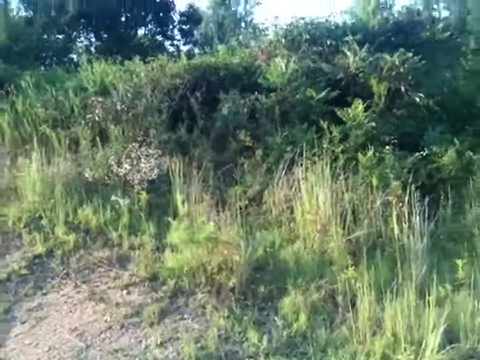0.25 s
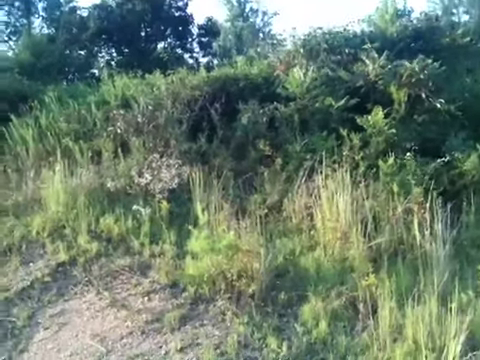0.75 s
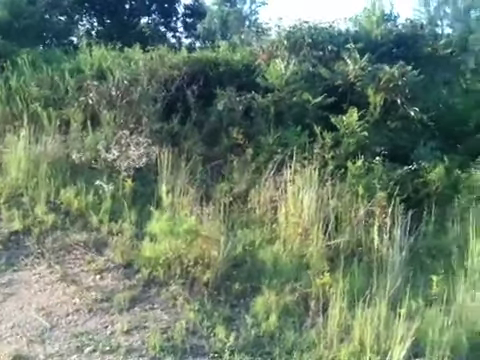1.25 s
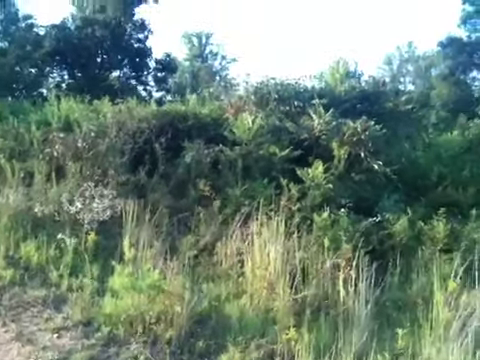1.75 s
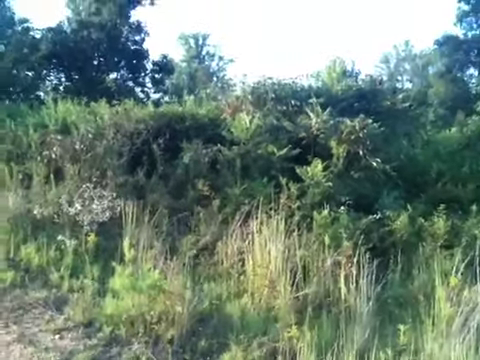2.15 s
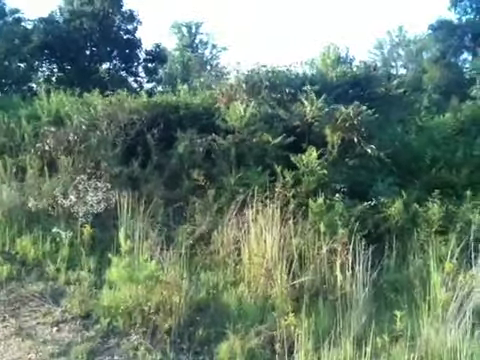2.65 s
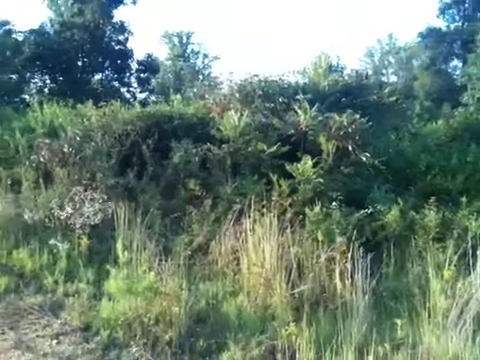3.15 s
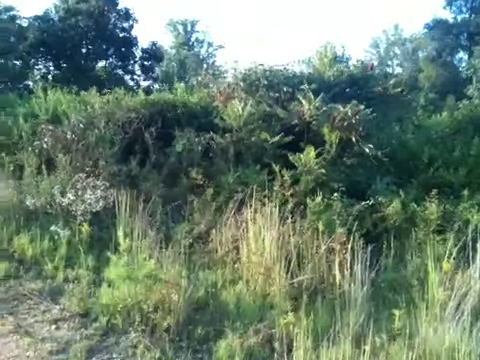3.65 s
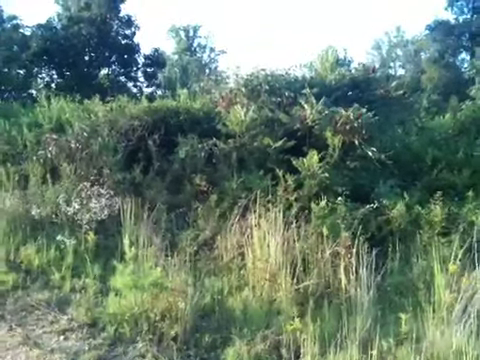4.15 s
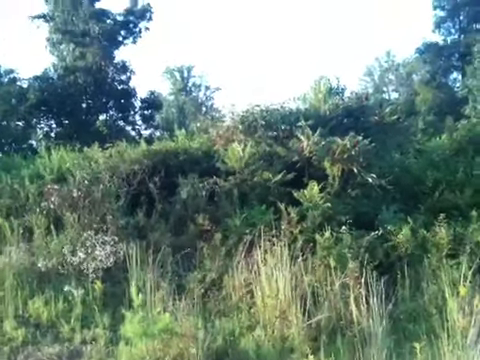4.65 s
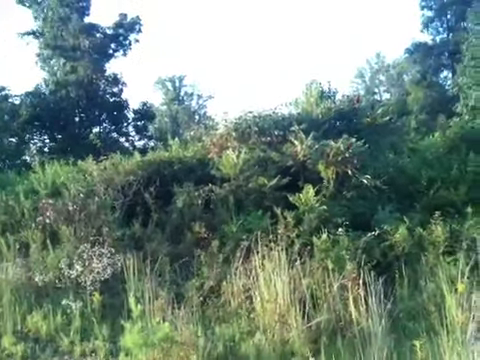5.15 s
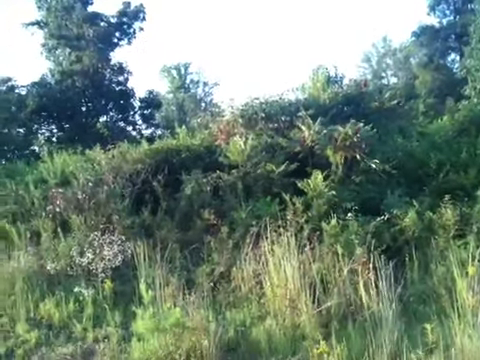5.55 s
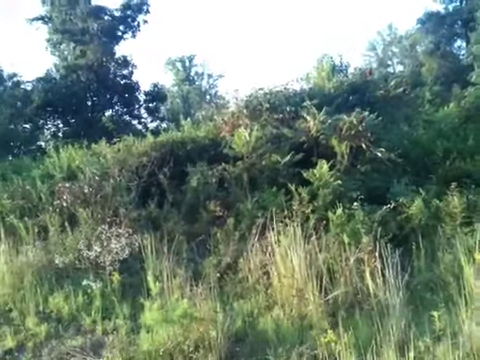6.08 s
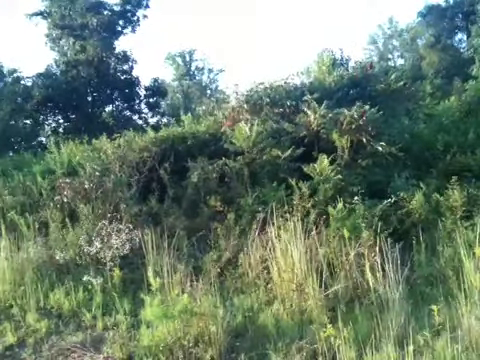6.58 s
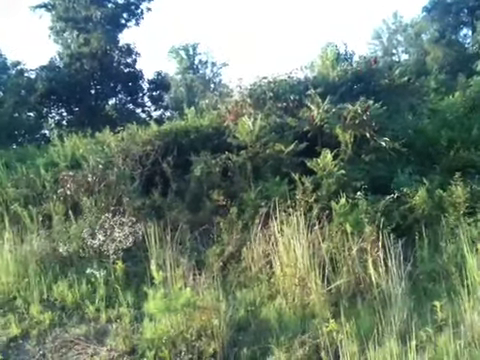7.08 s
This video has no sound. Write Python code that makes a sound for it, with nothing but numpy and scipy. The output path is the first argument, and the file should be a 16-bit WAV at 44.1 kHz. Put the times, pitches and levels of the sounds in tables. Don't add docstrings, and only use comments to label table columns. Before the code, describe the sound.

A small single-cylinder engine mutters, barks in raspy throttle blips, coasts down and pops on the overrun, over faint field insects.

```python
import sys
import numpy as np
from scipy import signal
from scipy.fft import rfft, irfft, next_fast_len
from scipy.io import wavfile
from scipy.ndimage import uniform_filter1d

SR = 44100
rng = np.random.default_rng(int(sys.argv[2]) if len(sys.argv) > 2 else 0)


def attenuation_scalar(level_db):
    decades = np.asarray(level_db, float) / 20
    return 10 ** decades


def master(y):
    cut = np.clip(np.atleast_2d(y).T, -1, 1)
    pcm = np.round(cut * 32767)
    wavfile.write(sys.argv[1], SR, pcm.astype(np.int16))


N = 322812


def rms_one(x):
    return x / np.sqrt(np.mean(x ** 2) + 1e-20)


def in_time(rows):
    s, *columns = np.transpose(rows)
    return [np.interp(np.arange(N) / SR, s, c) for c in columns]


def at_hz(points, hz):
    point_hz, point_db = np.transpose(points)
    return np.interp(np.log(hz), np.log(point_hz), point_db, left=-90, right=-90)


def coloured(spectrum, source=None):
    size = next_fast_len(N)
    hz = np.maximum(np.arange(size // 2 + 1) * SR / size, 1)
    source = rng.standard_normal(size) if source is None else source
    return rms_one(irfft(rfft(source, size) * attenuation_scalar(at_hz(spectrum, hz)), size)[:N])


def drift(rate_hz):
    r = np.exp(-80 * np.pi * rate_hz / SR)
    slow = signal.lfilter([1], [1, -2 * r, r * r], rng.standard_normal(N // 40 + 2002))[2000:]
    return np.interp(np.arange(N) / 40, np.arange(len(slow)), rms_one(slow))


def resonance(x, hz, width_hz):
    r = np.exp(-np.pi * width_hz / SR)
    top = np.array([1, 0, -1]) * (1 - r * r) / 2
    return signal.lfilter(top, [1, -2 * r * np.cos(2 * np.pi * hz / SR), r * r], x + 1e-18)


def passed(x, order, edges_hz, kind):
    return signal.sosfilt(signal.butter(order, edges_hz, kind, fs=SR, output="sos"), x)


# multiple of its pitch, level in dB coasting, at part load, wide open,
# die-away in ms, scatter in dB.
COLUMN = [
    (1.0, 1, -3, -1, 0.78, 0.5),
    (2.03, -30.5, -7.5, -15.5, 1.43, 1),
    (3.0, -10, -27.5, -28.5, 0.27, 5),
    (3.9, -20.5, -32.5, -29, 0.79, 3),
]
# time in s, column pitch in Hz, brightness in dB.
COLOUR = [(0, 575, 14.5), (.5, 546, 7), (.9, 539, 3.5), (1.15, 578, -1.5), (1.6, 569, 5), (2.37, 574, -1.5),
          (3.0, 534, 5.5), (4.6, 536, -4.5), (5.15, 527, -1), (5.6, 460, -15)]
LOAD_DB = [-49, -42, -28]
PORT_OPEN_MS, RISE_MS = 3.05, .7
OVERTONE_BASE_HZ = 563
SECOND_MODE_DB, SECOND_FOLLOWS = -1, 0.49


def pipe(at_s, peak_db, tilt_db, chance):
    ms = np.arange(900) / SR * 1000
    start = np.round(at_s * SR).astype(int)
    pitch_hz, bright_db = (c[start] for c in in_time(COLOUR))
    mode_db = [0, SECOND_MODE_DB + SECOND_FOLLOWS * bright_db, bright_db + tilt_db]
    pitch_hz = pitch_hz * (1 + .008 * chance[:, 0])
    crest = 2 * np.pi * (pitch_hz[:, None] * ms / 1000 - 3 / 4)
    linger = np.interp(peak_db, LOAD_DB, [1.9, 2.1, 1.0])
    rings = 0
    for k, (multiple, *load_db, die_ms, scatter_db) in enumerate(COLUMN):
        level_db = peak_db + np.interp(peak_db, LOAD_DB, load_db) + mode_db[min(k, 2)]
        level_db = level_db + scatter_db * chance[:, k + 1]
        dying = np.exp(-np.maximum(ms - PORT_OPEN_MS, 0) / (die_ms * linger)[:, None])
        stretch = OVERTONE_BASE_HZ / pitch_hz[:, None] if k > 1 else 1
        phase = multiple * stretch * crest - .5 * k + 0.41 * scatter_db * chance[:, [k + 2]]
        rings = rings + attenuation_scalar(level_db)[:, None] * np.cos(phase) * dying
    rings = rings * np.sin(np.pi / 2 * np.minimum(ms / RISE_MS, 1)) ** 2
    out = np.zeros(N + len(ms))
    np.add.at(out, start[:, None] + np.arange(len(ms)), rings)
    return passed(out[:N], 2, 275, "high")


# time in s, peak in dB, crack in dB re peak.
POPS = [(0.305, -54, -18.5), (5.356, -32, -13.5), (5.447, -30.5, -10.5), (5.541, -37, -18),
        (5.694, -29.5, -15), (5.815, -34, -9.5), (5.938, -35, -14.5), (6.066, -48, -12),
        (6.329, -31.5, -20), (6.433, -29.5, -14), (6.648, -31.5, -16)]
# frequency in Hz, level in dB per Hz.
CRACK = [(2200, -43), (2700, 3.5), (3600, 4), (4400, -3.5), (5500, -17.5)]
# frequency in Hz, level in dB per Hz.
CLATTER = [(110, -32), (180, -24.5), (204, -48), (233, -9), (418, 2), (612, 0), (675, 3.5), (843, -8.5),
           (1080, -3.5), (1500, -36.5), (1950, -20.5), (3300, -120)]
# frequency in Hz, level in dB per Hz.
WHINE = [(760, -0.5), (1300, 2), (1370, 1.5), (1750, -1.5), (2060, -5), (2460, -13), (2730, -18.5),
         (3750, -23), (4800, -27), (6240, -60.5), (10600, -120)]
PULSE_LEAD_S = .0027


def firings(turns, height_db):
    at = np.flatnonzero(np.diff(np.floor(turns)))
    peak_db = height_db[at]
    open_wide = np.clip((peak_db + 43.0) / 12, 0, 1)
    chance = rng.standard_normal((400, 7))
    peak_db = peak_db + (1.5 - .6 * open_wide) * chance[:len(at), 6]
    pulses = pipe(at / SR - PULSE_LEAD_S, peak_db, 0, chance[:len(at)])
    pop_s, pop_db, crack_db = np.transpose(POPS)
    pops = pipe(pop_s, pop_db - 8.5, crack_db + 36, chance[-len(POPS):])
    clicks = np.zeros(N)
    clicks[at - round(PULSE_LEAD_S * SR)] = attenuation_scalar(peak_db)
    puffs = uniform_filter1d(clicks, size=25)
    tail = signal.lfilter([1], [1, -attenuation_scalar(-60 / (0.058 * SR))], puffs)
    hiss = attenuation_scalar(-25.0) * coloured(WHINE) + attenuation_scalar(-38) * coloured(CRACK)
    body = attenuation_scalar(-24) * coloured(CLATTER)
    return pulses + pops + tail * (body + hiss * attenuation_scalar(in_time(COLOUR)[1]))


# time in s, firings per s.
SPEED = [(0.0, 40.55), (0.685, 47.34), (0.955, 41.54), (1.445, 61.7), (1.6, 50.53), (1.915, 62.1),
         (2.06, 51.1), (2.351, 62.93), (2.69, 47.89), (3.62, 40.54), (3.865, 46.74), (4.14, 44.51),
         (4.65, 44.32), (4.84, 38.76), (5.16, 46.53), (5.275, 32.68), (5.8, 32.84), (7.32, 22.93)]
SPIN_UP_S = .155


def crank():
    s, rate = np.transpose(SPEED)
    t = np.arange(N) / SR
    k = np.clip(np.searchsorted(s, t, "right") - 1, 0, len(s) - 2)
    gone, span, change = t - s[k], np.diff(s)[k], np.diff(rate)[k]
    rising = np.expm1(-gone / SPIN_UP_S) / np.expm1(-span / SPIN_UP_S)
    return rate[k] + change * np.where(change > 0, rising, gone / span)


# opens in s, shuts in s, firing peak in dB, opening in s, closing in s.
BLIPS = [
    (0, 0.207, -47.5, 0.042, 0.023),
    (0.213, 0.769, -43, 0.055, 0.016),
    (0.868, 0.912, -25.5, .01, 0.0056),
    (0.926, 1.463, -20, 0.013, .008),
    (1.549, 1.94, -21, 0.054, 0.0071),
    (2.017, 2.377, -20, 0.1, .008),
    (3.7, 4.677, -39, 0.14, 0.027),
    (4.797, 5.179, -20.5, 0.077, .07),
]
SAG_DB_PER_S = 7


def throttle():
    t, out = np.arange(N) / SR, np.zeros(N)
    for opens, shuts, peak_db, opening, closing in BLIPS:
        gate = np.clip(np.minimum((t - opens) / opening, (shuts - t) / closing), 0, 1)
        sag_db = SAG_DB_PER_S * np.clip(t - opens - opening, 0, shuts - opens)
        out = out + gate * attenuation_scalar(peak_db - sag_db)
    return out


# time in s, gain in dB.
AWAY = [(0, 2), (.45, -1.5), (.75, -3.5), (1.3, 0.5), (1.9, 0), (2.5, 0), (3.05, 0), (3.9, -6), (4.7, -7),
        (5.35, -2), (5.75, -3.5), (6.7, -5), (6.95, -8.5), (7.32, -9.5)]
USUAL_SPEED_HZ, LOAD_LAG_S = 45, .05


def gear_db(law, speed, blips):
    base_db, by_speed, *load_db, away = law
    load = 20 * np.log10(uniform_filter1d(blips, size=round(LOAD_LAG_S * SR)).clip(1e-5))
    speed_db = by_speed * 20 * np.log10(speed / USUAL_SPEED_HZ)
    return base_db + speed_db + np.interp(load, LOAD_DB, load_db) + away * in_time(AWAY)[0]


# frequency in Hz, level in dB.
HUM = [(40, -18), (62, -18.5), (80, -3), (150, -4.5), (185, -21), (230, -24), (300, -14.5), (370, -15)]


def hum(turns, speed, low_db, high_db):
    out, loose = 0, np.interp(speed, [33, 42], [4.0, 1.0])
    for k in range(1, 10):
        high_share = np.clip((k * speed - 119) / 9, 0, 1)
        level_db = low_db + (high_db - low_db) * high_share + at_hz(HUM, k * speed)
        level = attenuation_scalar(level_db + 2.5 + loose * drift(5))
        out = out + level * np.sin(2 * np.pi * k * turns + .1 * loose * k * drift(4))
    return out


def clatter(turns, body_db, whine_db):
    contacts = np.interp(turns % 1, np.linspace(0, 1, 160), rng.standard_normal(160))
    source = .36 * rms_one(contacts) + rng.standard_normal(N)
    beat = np.cos(2 * np.pi * turns)
    body = attenuation_scalar(body_db + 1.5 * beat + 1.5 * drift(14)) * coloured(CLATTER, source)
    return body + attenuation_scalar(whine_db + 0.5 * beat + 0.63 * drift(41)) * coloured(WHINE)


def thump(height):
    return height * attenuation_scalar(-54.0) * rms_one(passed(rng.standard_normal(N), 2, [25, 75], "band"))


# time in s, level in dB.
CRICKET = [(0, -75), (1.3, -73), (2.4, -84.5), (4.0, -77), (5.4, -71.5), (6.4, -73.5), (7.0, -78.5)]
# time in s, level in dB.
CHORUS = [(0, -81), (.7, -86), (1.9, -89), (2.7, -104), (4.0, -96), (4.9, -82), (7.32, -82)]
# time in s, level in dB.
RASP = [(0, -100), (6.2, -93), (6.75, -81), (7.05, -71.5), (7.32, -71.5)]
DRONE_DB = -79.5


def insects():
    t = np.arange(N) / SR
    stroke = np.maximum(np.sin(2 * np.pi * (28.0 * t + 0.26 * drift(0.31))) + 0.18, 0)
    near = rms_one(stroke * attenuation_scalar(1.5 * drift(3)) * np.sin(2 * np.pi * 8172 * t + 1.3 * drift(25)))
    noise = rng.standard_normal((4, N))
    narrow = rms_one(resonance(resonance(noise[0], 7510, 220), 7510, 220))
    wide = rms_one(passed(noise[1], 3, [6800, 8500], "band"))
    chorus = (.6 * narrow + .8 * wide) * (1 + .3 * np.sin(2 * np.pi * 27.5 * t + 2.5 * drift(1.5)))
    drone = rms_one(passed(noise[2], 3, [5050, 6700], "band"))
    drone = drone * (1 + 0.54 * np.sin(2 * np.pi * 77 * t + .8 * drift(3.4)))
    rasp = rms_one(passed(noise[3], 3, [10600, 15900], "band"))
    rasp = rasp * np.maximum(np.cos(2 * np.pi * 12.55 * (t - 7.055)), 0) ** 2.3
    near_db, chorus_db, rasp_db = (in_time(rows)[0] for rows in (CRICKET, CHORUS, RASP))
    return attenuation_scalar(near_db) * near + attenuation_scalar(chorus_db) * chorus + attenuation_scalar(DRONE_DB) * drone + attenuation_scalar(rasp_db) * rasp


# frequency in Hz, level in dB per Hz.
FIELD = [(24, -39), (40, -21.5), (104, 5.5), (220, -5), (491, 2), (615, -3), (810, -22), (1680, -12.5),
         (4680, -22.5), (5580, -9), (6490, -13), (7540, 0.5), (9450, -27.5), (14800, -19.5), (16000, -24)]
FIELD_DB = -62.5


def field_hush():
    return attenuation_scalar(FIELD_DB - 1.5) * coloured(FIELD)


# time in s, peak in dB.
IDLE = [(0, -62), (.8, -64.5), (1.5, -42.5), (2.38, -45), (2.6, -75), (3.6, -44), (3.7, -52.5), (6.0, -51),
        (6.3, -58), (7.32, -72)]
# level in dB, dB per dB of speed, dB coasting, dB at part load,
# dB wide open, share of the distance loss.
BODY = (-55.5, 0.92, 0.6, 3, -2, 1.56)
GEARS = (-61.5, 2.5, 2.13, 0, 3, 1.1)
HUM_LOW = (-69, 1.4, 3, 7.5, 13.5, 0.84)
HUM_HIGH = (-64.5, 2, 5, 0, 9, 0.2)
# frequency in Hz, width in Hz, depth 0-1.
ENGINE_DIPS = [(848, 150, 0.2), (1366, 274, 0.68), (2420, 100, 0.5)]
FIRST_TURN = .427


def scene():
    speed, blips = crank(), throttle()
    height = blips + attenuation_scalar(in_time(IDLE)[0])
    turns = FIRST_TURN + np.cumsum(speed) / SR
    pulses = firings(turns, 20 * np.log10(height))
    smear = rng.standard_normal(4000) * attenuation_scalar(-60 * np.arange(4000) / SR / 0.12)
    echo = attenuation_scalar(-48) * signal.fftconvolve(pulses, smear)[:N]
    low_db, high_db, body_db, whine_db = (gear_db(law, speed, blips) for law in (HUM_LOW, HUM_HIGH, BODY, GEARS))
    engine = pulses + echo + hum(turns, speed, low_db, high_db) + clatter(turns, body_db, whine_db)
    for hz, width_hz, depth in ENGINE_DIPS:
        engine = engine - depth * resonance(engine, hz, width_hz)
    far = passed(engine + field_hush(), 4, 72, "high")
    return (far + thump(height) + insects())[None]


def band_limit(x):
    return signal.sosfilt(signal.butter(12, 15600, fs=SR, output="sos"), x)


def record(dry):
    return band_limit(dry)


dry = scene()
out = record(dry)
master(out)
```